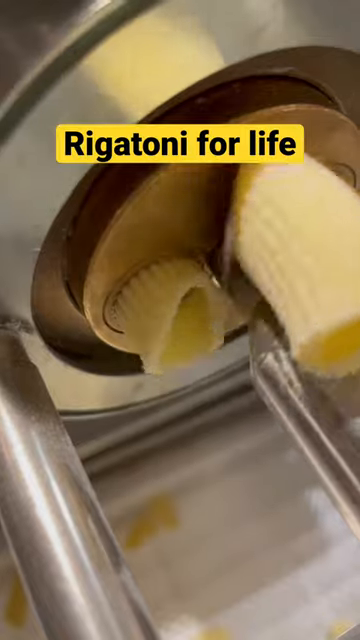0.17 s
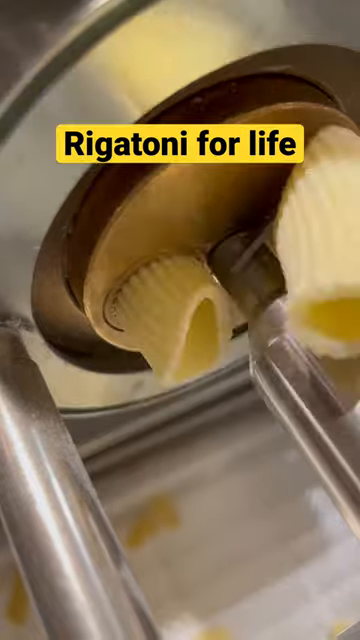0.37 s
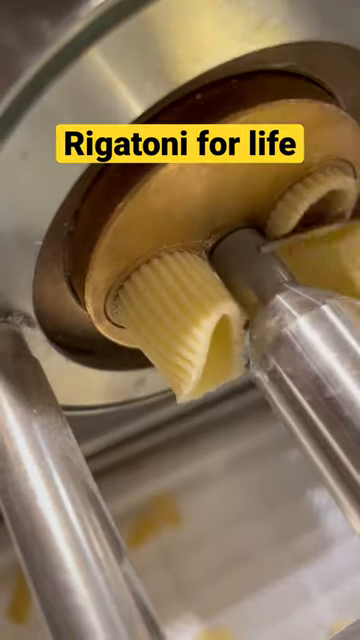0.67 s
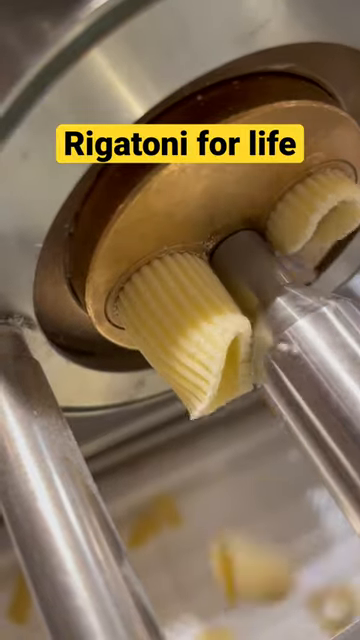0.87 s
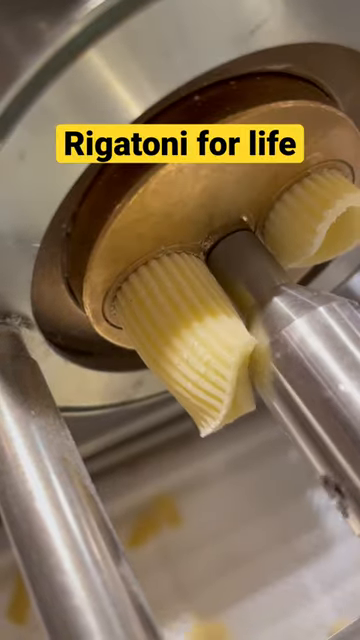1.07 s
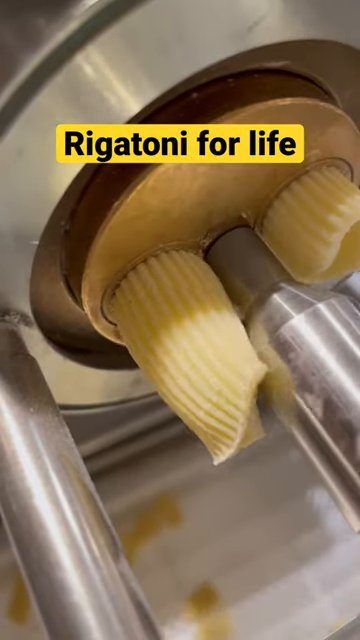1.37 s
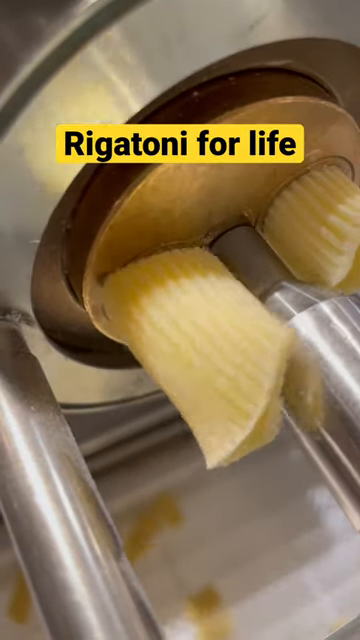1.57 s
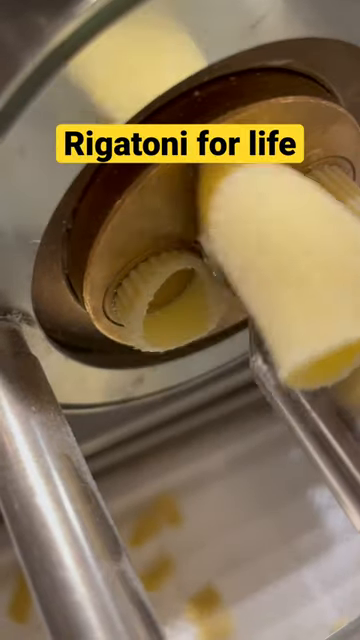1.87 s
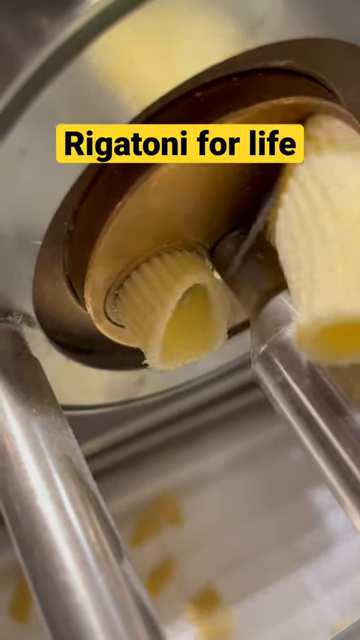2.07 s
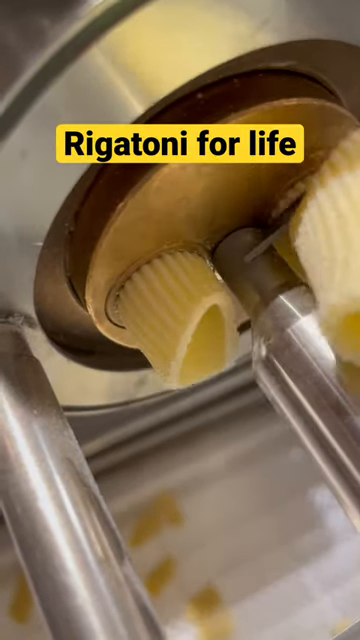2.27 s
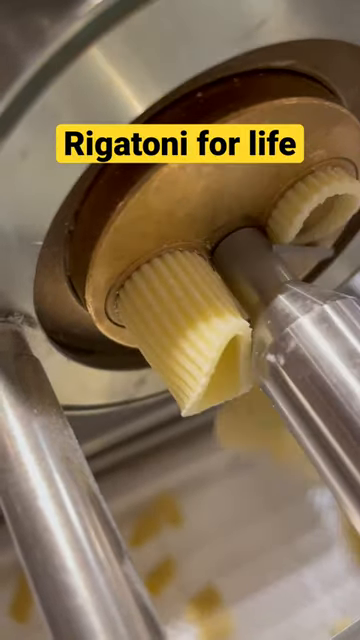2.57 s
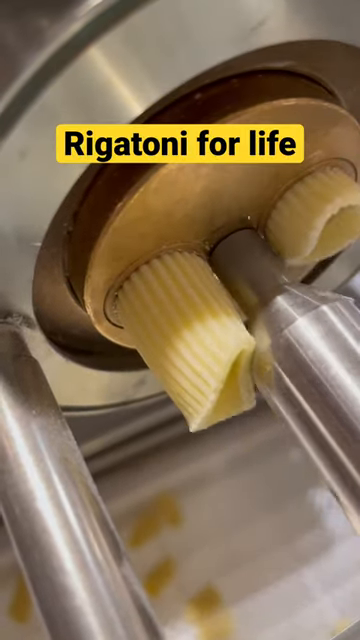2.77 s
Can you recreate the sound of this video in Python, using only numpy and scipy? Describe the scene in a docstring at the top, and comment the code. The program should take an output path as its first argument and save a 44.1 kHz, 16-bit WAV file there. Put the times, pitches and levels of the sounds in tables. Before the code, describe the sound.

Close stereo pickup of an electric pasta extruder running without pause in a kitchen: droning, slightly wavering gear hum, airy whir, faint piercing whine, a tick and soft thud at one second, fainter ones near 2.8 seconds.

```python
"""A geared pasta extruder at close range

A 26-tooth pinion on the motor drives a 36-tooth wheel: periodic run-out modulates the tooth tone and its
overtones, which ring the housing. The speed drive whines near 8 kHz as a carrier with sidebands, over motor
tones, resonant noise for the whir and a ringing panel, and one faint hoot. Near 1.0 and 2.8 s the cutter taps
and pieces of pasta drop: sums of decaying modes. Two channels differ in level and phase, with room noise."""
import sys
import numpy as np
from scipy.fft import rfft, irfft, next_fast_len
from scipy.io import wavfile
from scipy.ndimage import uniform_filter1d, map_coordinates

SR = 44100
rng = np.random.default_rng(int(sys.argv[2]) if len(sys.argv) > 2 else 0)


def wav_out(sig):
    """Save sig, one row per channel (or a flat mono array), as 16-bit PCM at SR to the path in sys.argv[1]."""
    wavfile.write(sys.argv[1], SR, np.round(np.clip(np.atleast_2d(sig).T, -1, 1) * 32767).astype(np.int16))


N = 128772
T = np.arange(N) / SR
MESH_HZ, WHEEL_TEETH, PINION_TEETH = 639.9, 36, 26
# rotation angles of the two gears [rad]
WHEEL = 2 * np.pi * MESH_HZ * T / WHEEL_TEETH
PINION = 2 * np.pi * MESH_HZ * T / PINION_TEETH


def amp(db):
    """The decibel law: level in dB to amplitude ratio."""
    return 10 ** (np.asarray(db) / 20)


def unit(x):
    """Normalization to unit root-mean-square."""
    return x / np.sqrt(np.mean(np.abs(x) ** 2) + 1e-20)


def along(points, hz):
    """Interpolation of (Hz, value) points on a logarithmic frequency axis."""
    f, v = np.transpose(points)
    return np.interp(np.log(hz + 1), np.log(f + 1), v)


def wobble(rate):
    """Smooth random modulation: a spline through random knots, rate of them a second."""
    knots = rng.standard_normal(int(N * rate / SR) + 4)
    return map_coordinates(knots, [T * rate])


def filtered(x, response):
    """Linear filtering: the spectrum is multiplied by a complex response of frequency."""
    m = next_fast_len(N + SR // 2)
    return irfft(rfft(x, m) * response(np.fft.rfftfreq(m, 1 / SR)), m)[..., :N]


def peak(f, hz, width):
    """The response of a damped resonator, 1 at its centre."""
    return 1j * f * width / (hz * hz - f * f + 1j * f * width)


def tone(db, angle, waver_db):
    """A sinusoid of nominal rms level db, slowly amplitude modulated, from a random phase."""
    level_db = db + waver_db * wobble(14)
    return np.sqrt(2) * amp(level_db) * np.sin(angle + rng.uniform(0, 2 * np.pi))


# moments when the teeth bite harder or softer: start_s (centre of the bell) [s],
# overtone_db [dB], treble_whir_db [dB]
TOOTH_BITES = [(.055, 0, 1), (.22, -0.5, 0.5), (.28, -1.5, -0.5), (.34, 0, 2), (.785, -1, 1), (.9, -3, 0.5),
               (1.35, 3, 2), (1.47, 1, 1.5), (2.03, 2, 0.5), (2.249, 1, 1), (2.415, 2, 2.5),
               (2.535, 2.5, 2.5)]
BITE_S = .014  # standard deviation of the bell


def bites(column):
    """Transient modulation: Gaussian level changes in dB from one column of the bites."""
    return sum(row[column] * np.exp(-.5 * ((T - row[0]) / BITE_S) ** 2) for row in TOOTH_BITES)


# run-out of the gears: wheel_cycles [per wheel turn], pinion_cycles [per pinion turn], both rounded
# to whole cycles; swell_db [dB], swell_at [deg], sway [deg], sway_at [deg]
FUNDAMENTAL_RUNOUT = [(1, 0, 2.2, 268, 8, 190), (2, 0, .3, 341, 2.1, 64), (0, 1, 1.3, 116, 6, 282),
                      (-1, 1, 1.6, 84, 5, 305), (2, 1, .2, 68, 3, 339)]
SECOND_RUNOUT = [(1, 0, 4, 354, 10, 28), (2, 0, 1.9, 4, 26, 240), (3, 0, 1, 264, 5, 165),
                 (0, 1, 3.2, 45, 14, 5.5), (-0.5, 1, 0.92, 156, 10, 77)]
THIRD_HARMONIC_RUNOUT = [(1, 0, 9, 250, 30, 250), (0, 1, 5, 100, 30, 10)]
# housing resonance rung by each harmonic: pitch_hz [Hz], width_hz [Hz], gain [amplitude ratio]
HOUSING_MODES = [(578, 15.8, 7.54), (1223.5, 33.2, 8), (1948, 49, 1.5)]
# base level of the tooth force at harmonics 1, 2, 3, ahead of the housing: level_db [dB]
TOOTH_FORCE_DB = [-33, -48, -76]
# tooth-to-tooth scatter of harmonics 1, 2, 3: share [ratio]
TOOTH_SCATTER = [0.12, 0.24, 0.89]
# load on the gears, used relative to its mean: start_s [s], level_db [dB]
GEAR_LOAD = [(0.1, -29), (0.27, -27), (0.56, -30), (1.32, -28.5), (1.49, -29.5), (2.9, -29.5)]


def gears(mesh):
    """Amplitude and phase modulation by run-out: each tooth-rate harmonic swells, sways and rings the housing."""
    load_db = np.interp(T, *np.transpose(GEAR_LOAD))
    load_db = load_db - load_db.mean()
    out = 0
    for k, runout in enumerate([FUNDAMENTAL_RUNOUT, SECOND_RUNOUT, THIRD_HARMONIC_RUNOUT]):
        swell_db, sway = 0, 0
        for wheel_cycles, pinion_cycles, db, swell_at, deg, sway_at in runout:
            turn = round(wheel_cycles) * WHEEL + round(pinion_cycles) * PINION
            swell_db = swell_db + db * np.cos(turn - np.radians(swell_at))
            sway = sway + np.radians(deg) * np.cos(turn - np.radians(sway_at))
        scatter = 1 + TOOTH_SCATTER[k] * (wobble(90) + 1j * wobble(90))
        bite_db = (k > 0) * bites(column=1)  # the fundamental is left out
        level = amp(TOOTH_FORCE_DB[k] + swell_db + bite_db + load_db)
        force = level * scatter * np.exp(1j * ((k + 1) * mesh + sway))
        hz, width, gain = HOUSING_MODES[k]
        out = out + filtered(np.sqrt(2) * force.real, lambda f: 1 + gain * peak(f, hz, width))
    return out


# harmonics of the motor shaft rate: order [multiple of the shaft rate], level_db [dB rms]
SHAFT_ORDERS = [(20, -61), (31, -61), (35, -60), (46, -41), (61, -64)]
# other tones of the machine: pitch_hz [Hz], level_db [dB rms]
MACHINE_TONES = [(80, -63), (119.9, -64), (240, -61.5), (400.4, -60), (456, -61), (476.2, -60),
                 (799.9, -61), (1385.5, -63), (1616.6, -64), (1760.3, -68), (1901.9, -65), (2089.9, -66),
                 (3456.4, -72), (3838.3, -70), (7041.5, -71)]
ORDER_WAVER_DB = 1.3


def motor(mesh):
    """Harmonics of rotation: shaft orders locked to the tooth phase, and other tones wavering in level and phase."""
    orders = sum(tone(db, k * mesh / PINION_TEETH, ORDER_WAVER_DB) for k, db in SHAFT_ORDERS)
    others = 0
    for hz, db in MACHINE_TONES:
        angle = 2 * np.pi * hz * T + 0.36 * wobble(5.05)
        others = others + tone(db, angle, waver_db=5.0)
    return orders + others


# ripple sidebands: step [ripple rates from the carrier], level_db [dB rms]
RIPPLE_SIDEBANDS = [(-5, -71), (-3, -63), (-2, -57), (-1, -63), (0, -49.5), (1, -49), (2, -50.5),
                    (3, -54.5)]
# slot sidebands: step [motor orders from the carrier], level_db [dB rms]
SLOT_SIDEBANDS = [(-12, -70), (12, -58.5)]
# ripple hum: order [multiple of the ripple rate], level_db [dB rms]
RIPPLE_HUM = [(2, -62), (3, -61)]
CARRIER_HZ, RIPPLE_HZ = 7972.87, 100.28
WHINE_WAVER_DB = .7
SWEEP_RAD, SWEEP_MID = -.62, .75  # phase bend [rad per step squared] and its middle [ripple step]


def drive():
    """Modulation sidebands: quadratic phase makes the switching whine slide up in pitch within each ripple."""
    carrier, ripple = 2 * np.pi * CARRIER_HZ * T, 2 * np.pi * RIPPLE_HZ * T
    comb = 0
    for k, db in RIPPLE_SIDEBANDS:
        level = amp(db + WHINE_WAVER_DB * wobble(15))
        bend = SWEEP_RAD * (k - SWEEP_MID) ** 2
        comb = comb + np.sqrt(2) * level * np.cos(carrier + k * ripple + bend)
    shaft = 2 * np.pi * MESH_HZ / PINION_TEETH * T
    slots = sum(tone(db, carrier + k * shaft, waver_db=3.5) for k, db in SLOT_SIDEBANDS)
    hum = sum(tone(db, k * ripple, waver_db=0.6) for k, db in RIPPLE_HUM)
    return comb + slots + hum


# relative spectrum of the whir: pitch_hz [Hz], level_db [dB per Hz]
WHIR_SPECTRUM = [(15, -47.5), (28, -10.5), (80, -4.5), (165, -12), (240, -4.5), (330, -8), (440, -0.5),
                 (520, -3.5), (760, 0), (930, -3), (1020, -8), (1200, 0), (1420, -12.5), (1730, -14),
                 (2500, -18), (2850, -21), (4000, -25), (4800, -32), (5200, -30.5), (6200, -24),
                 (6800, -20), (7150, -26), (7400, -23), (7600, -28.5), (7750, -22), (8280, -20.5),
                 (8400, -22)]
# resonances in the whir: pitch_hz [Hz], width_hz of each of two passes [Hz], relative level_db [dB]
WHIR_RESONANCES = [(1175, 70, 5), (1942, 90, 0), (2120, 80, -7), (2530, 220, -8), (3200, 150, -9),
                   (3820, 70, -12), (5170, 220, -20), (5750, 60, -17), (6400, 70, -12), (6970, 170, -12)]
# drift of the whir under 520 Hz: start_s [s], level_db [dB]
BASS_DRIFT = [(.1, -1), (.35, -0.5), (.8, 1), (1.2, 0), (1.35, 0.5), (1.62, 2), (1.72, -0.5), (2.1, -1.5),
              (2.35, 2), (2.6, -1.5), (2.85, 1.5)]
WHIR_DB, PEAKS_DB = -37.5, -46  # rms levels of the broad noise and of the resonances together
WHIR_SWELL_DB, WHIR_SWELL_DEG = 1.3, 317
RASP_DB, RASP_PER_S = 2.5, 45  # each resonance flutters on its own: depth, knots a second


def whir():
    """Filtered noise of bearing, fan and teeth, its treble swelling each wheel turn; one close, two for the room."""
    turn_db = WHIR_SWELL_DB * np.cos(WHEEL - np.radians(WHIR_SWELL_DEG))
    swell = amp(turn_db + bites(column=2) + 0.37 * wobble(7.9) + 0.87 * wobble(300))
    noise = rng.standard_normal((4, N))
    bass = filtered(noise, lambda f: f < 1100)
    low = filtered(noise, lambda f: f < 520)
    drift = amp(np.interp(T, *np.transpose(BASS_DRIFT)))
    noise = drift * low + (bass - low) + swell * (noise - bass)
    broad = filtered(noise[:3], lambda f: amp(along(WHIR_SPECTRUM, f)))
    broad = amp(WHIR_DB) * broad / np.std(broad[0])
    rings = 0
    for hz, width, db in WHIR_RESONANCES:
        ring = filtered(noise[3], lambda f: peak(f, hz, width) ** 2)
        rings = rings + amp(db + RASP_DB * wobble(RASP_PER_S)) * ring
    return broad[0] + amp(PEAKS_DB) * unit(rings), broad[1:]


# swell of the panel: wheel_cycles [per wheel turn], pinion_cycles [per pinion turn],
# swell_db [dB], swell_at [deg]
PANEL_RUNOUT = [(-1, 1, 6, 140), (2, -1, 2, 294)]
PANEL_HZ, PANEL_WIDTH_HZ, PANEL_DB = 582, 30, -41  # width of each of two passes; rms level


def panel():
    """Resonance under random excitation: a panel rings with noise that swells as the two run-outs meet."""
    swell_db = 0
    for wheel_cycles, pinion_cycles, db, at in PANEL_RUNOUT:
        turn = wheel_cycles * WHEEL + pinion_cycles * PINION
        swell_db = swell_db + db * np.cos(turn - np.radians(at))
    noise = amp(swell_db) * rng.standard_normal(N)
    ring = filtered(noise, lambda f: peak(f, PANEL_HZ, PANEL_WIDTH_HZ) ** 2)
    return amp(PANEL_DB) * unit(ring)


BLOW_SCATTER_DB, BLOW_DETUNE = 1.5, .012  # spread of mode level, and of mode pitch as a ratio


def struck(rows, modes, low_hz, middle_hz, attack_s, crack, flutter_s):
    """Modal synthesis: blows excite decaying modes and a short crack; rough blows scrape, so modes flutter and spread."""
    out, t = np.zeros(N + SR), T[:SR // 4]
    for start_s, db, low_db, middle_db, rough in rows:
        ring, rough = 0, np.clip(rough, 0, 1)
        for hz, level, t60 in modes:
            extra_db = low_db if hz < low_hz else middle_db if hz < middle_hz else 0
            level = level + extra_db + rng.normal(0, BLOW_SCATTER_DB)
            flutter = unit(uniform_filter1d(rng.standard_normal(len(t)), size=round(flutter_s * SR)))
            envelope = amp(level - 60 * t / t60) * (1 - rough + rough * flutter)
            ring = ring + envelope * np.sin(2 * np.pi * hz * rng.normal(1, BLOW_DETUNE) * t)
        snap = crack * amp(-60 * t / 0.011) * rng.standard_normal(len(t))
        blow = ring * (1 - np.exp(-t / attack_s)) + snap
        out[round(start_s * SR):][:len(t)] += amp(db) * blow
    return out[:N]


# cutter taps: start_s [s], level_db scaling the blow [dB], low_mode_extra_db [dB],
# middle_mode_extra_db [dB], roughness [0-1]
CUTTER_TAPS = [(.9895, -28.5, -3, -6, .3), (.9915, -37, 10, -3, .2), (.995, -39, 11, 2, .3),
               (1.0181, -30.5, -14, -4, .25), (2.7546, -38, -8, 5, .35), (2.8044, -39.5, -12, -4, .6)]
# modes of the blade: pitch_hz [Hz], relative level_db [dB], t60 [s]
BLADE_MODES = [(1420, -6, .03), (2380, 0, .02), (2850, -6, .016), (3500, -6, .012), (4280, -2, .018),
               (5200, 3, .015), (5650, -3, .012), (6500, -9, .008)]


def cutter():
    """Impact on a stiff body: each tap cracks and rings the short, high modes of the blade."""
    return struck(CUTTER_TAPS, BLADE_MODES, low_hz=2600, middle_hz=4600,
                  attack_s=0.00059, crack=1.1, flutter_s=.0015)


# falling pasta: start_s [s], level_db scaling the blow [dB], low_mode_extra_db [dB],
# middle_mode_extra_db [dB], roughness [0-1]
PASTA_DROPS = [(1.008, -33.5, 1, -4, .1), (1.04, -30.5, -14, 1, .1), (1.072, -38, -5, 0, .2),
               (2.765, -38, 2, -3, .2), (2.8, -38, 0, -3, .2)]
# modes of the tray: pitch_hz [Hz], relative level_db [dB], t60 [s]
TRAY_MODES = [(85, 0, .1), (230, -8, .06), (290, -1, .09), (345, 0, .1), (410, -5, .06)]


def drops():
    """Soft impact: a slower attack without a crack rings the low modes of the tray."""
    return struck(PASTA_DROPS, TRAY_MODES, low_hz=150, middle_hz=320,
                  attack_s=0.0017, crack=0, flutter_s=0.013)


HOOT_S, HOOT_LENGTH_S, HOOT_DB = 1.305, 0.077, -40  # start, duration, rms level at the crest
HOOT_HZ, HOOT_RISE_HZ = 415, 60


def hoot():
    """Frequency modulation: a faint low tone swells once and bends up towards its end."""
    u = np.clip((T - HOOT_S) / HOOT_LENGTH_S, 0, 1)
    angle = 2 * np.pi * np.cumsum(HOOT_HZ + HOOT_RISE_HZ * u ** 3) / SR
    envelope = np.sqrt(np.sin(np.pi * u).clip(0))
    return envelope * tone(HOOT_DB, angle, waver_db=1.5)


# room sound against the whir: pitch_hz [Hz], level_db [dB]
ROOM_SPECTRUM = [(30, -67.5), (100, -32.5), (300, -17), (1000, -6.5), (2500, -6), (4000, 1), (4800, 0),
                 (5500, -16.5), (8000, 2.5)]


def room(noises):
    """Diffuse field: a separate noise in each channel, coloured by the room."""
    return filtered(noises, lambda f: amp(along(ROOM_SPECTRUM, f)))


# level of the left channel over the right: pitch_hz [Hz], level_db [dB]
LEFT_OVER_RIGHT = [(60, 0.0), (84, 0.0), (120, 0.5), (160, 0.5), (230, 1.0), (320, 1.5), (440, 1.5),
                   (620, 7.0), (870, 3.0), (1210, 2.0), (1690, -0.5), (2360, -0.5), (3300, 2.5),
                   (4610, 0.5), (6430, 0.0), (8980, 0.0)]
# phase lead of the left channel over the right: pitch_hz [Hz], lead [rad]
LEFT_PHASE_LEAD = [(0, 0), (430, 0.1), (690, -0.3), (1380, -0.7), (1720, 0.0), (2410, 0.7), (2840, 1.4),
                   (3530, 0.3), (3960, 0.5), (4480, 1.3), (4820, 3.3), (5250, 6.2), (6370, 7.2),
                   (8180, 8.4), (8530, 9.3), (9130, 9.4)]


def two_channels(mono):
    """Interchannel level and phase differences, shared equally between left and right."""
    def responses(f):
        left = amp(along(LEFT_OVER_RIGHT, f) / 2) * np.exp(.5j * along(LEFT_PHASE_LEAD, f))
        return np.array([left, 1 / left])
    return filtered(mono, responses)


SPEED_WANDER_RAD = .3  # slow wander of the tooth phase


def scene():
    """Superposition: all close sources share one pair of channel responses, and the room adds unrelated noise."""
    mesh = 2 * np.pi * MESH_HZ * T + SPEED_WANDER_RAD * wobble(2)
    near, room_noises = whir()
    machine = gears(mesh) + motor(mesh) + drive() + near + panel()
    return two_channels(machine + cutter() + drops() + hoot()) + room(room_noises)


START_S, TOP_HZ = .0363, 8380


def record(dry):
    """Band limitation: sound begins after a moment of silence and nothing is kept above the top frequency."""
    return filtered(dry * (T > START_S), lambda hz: hz < TOP_HZ)


dry = scene()
out = record(dry)
wav_out(out)
```